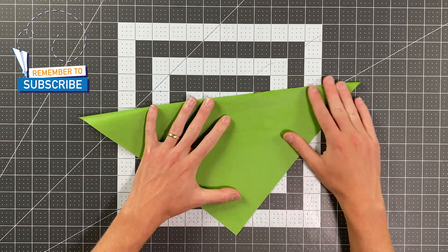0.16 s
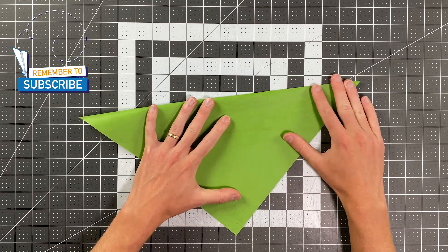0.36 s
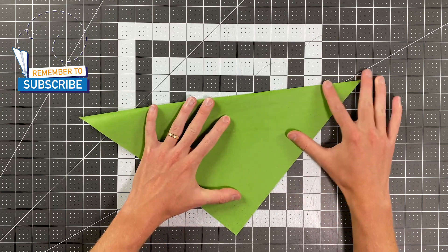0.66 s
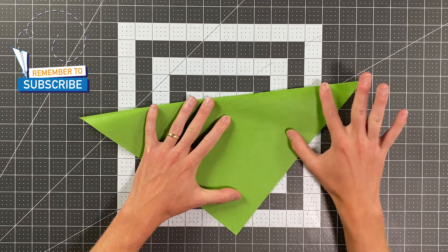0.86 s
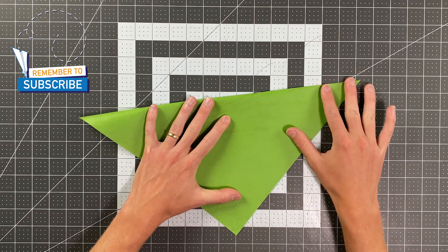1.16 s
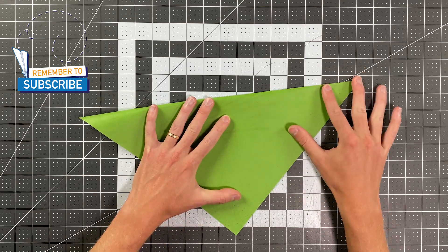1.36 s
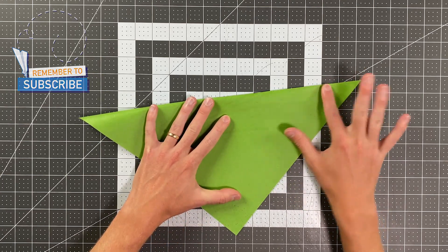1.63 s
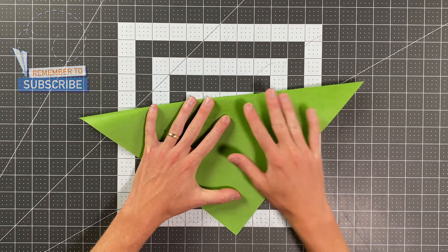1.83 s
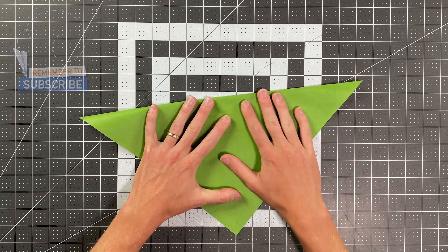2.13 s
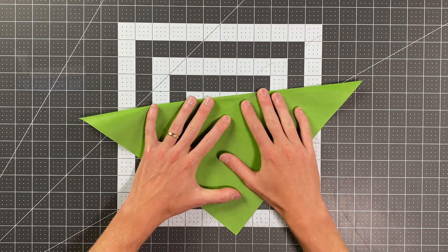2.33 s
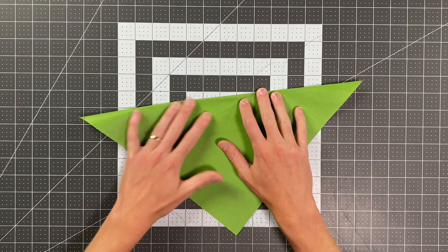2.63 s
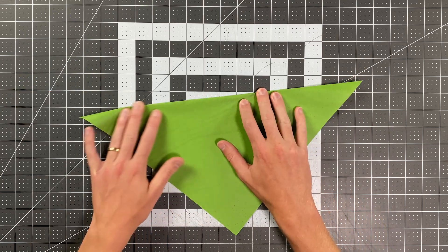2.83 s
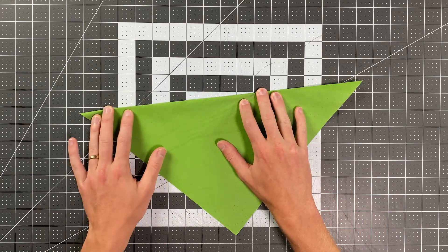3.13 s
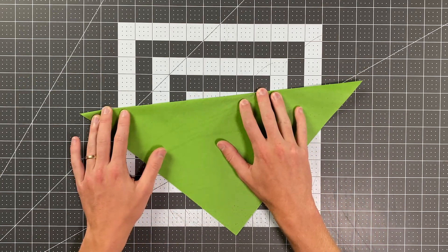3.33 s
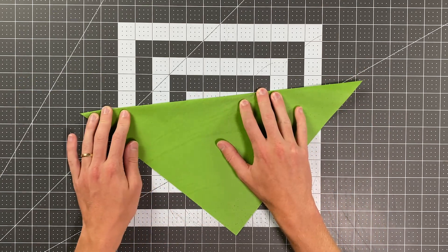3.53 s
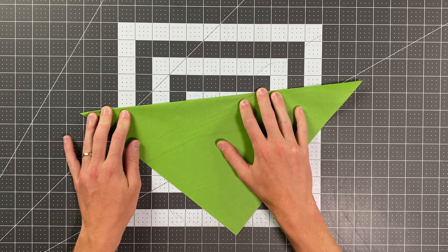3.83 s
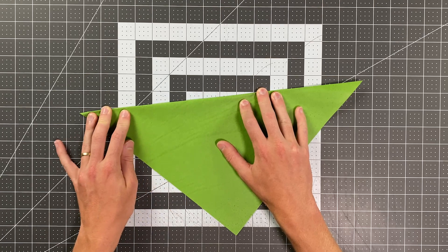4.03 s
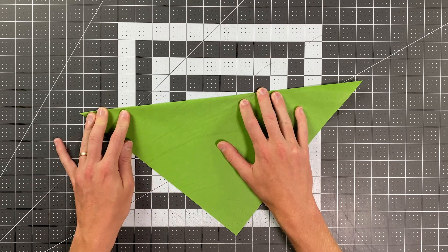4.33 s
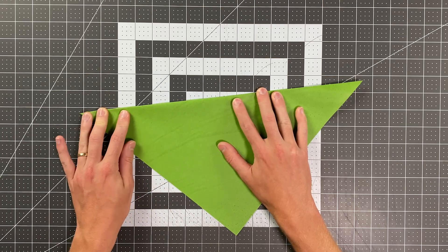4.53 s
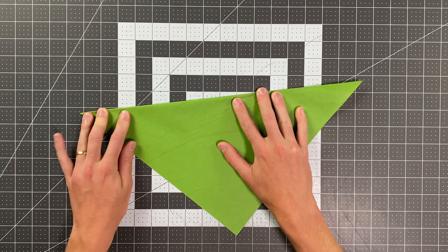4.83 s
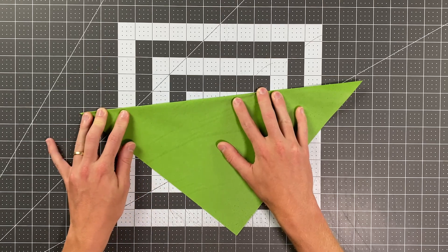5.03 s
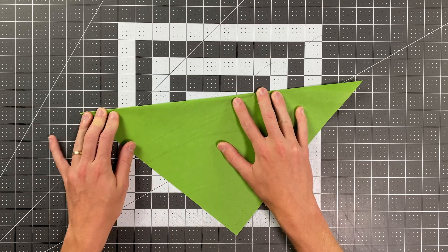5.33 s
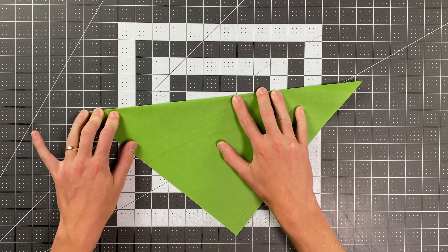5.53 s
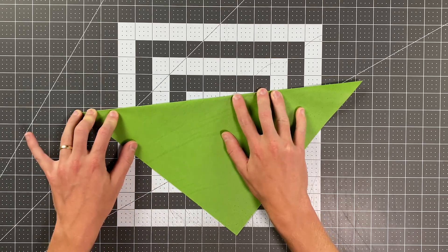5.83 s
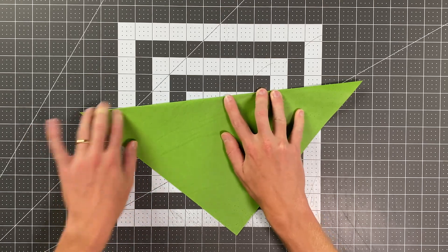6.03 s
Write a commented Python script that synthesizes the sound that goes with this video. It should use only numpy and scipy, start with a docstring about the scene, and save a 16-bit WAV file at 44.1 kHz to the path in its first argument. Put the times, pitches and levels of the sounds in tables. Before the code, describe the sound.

A close, dry sound of hands folding a big thin paper sheet on a table in a small room, with faint low hum and hiss. At 0 s a sharp crinkle opens a bright, hissing hand slide whose papery ring rises, fading by 0.3 s. A short finger swish comes at 0.6 s, then a cluster of thin crackles from 0.8 to 1.03 s. Light pats and scuffs follow at 1.25 and 1.4 s. Around 1.65-1.75 s the sheet crackles and rustles loose; a crisp snap comes at 1.94 s. A muffled double pat thumps the table at 2.34 s. At 2.66 s a loud, sharp snap cuts into a second, softer swish, ending near 3.07 s. Then mostly quiet: little rubs around 3.2 and 3.5 s, a tick and scuff at 4.1 s, stuttering fingertip ticks at 4.3 and faintly 4.9 s, brief scuffs from 5.1 to 5.5 s, ticks with a soft pat at 5.76 s, and a final quick swish near 6.1 s.

```python
"""Folding a paper sheet

Two hands press a fold into a large sheet of thin paper on a cutting mat, close to a microphone in a small room.
Fingers swish along the crease: shaped noise for friction, with a tuned band of noise for the ringing sheet.
The buckling sheet snaps as dispersive bending waves; stick-slip fingertips stutter; pats excite table modes.
The freed sheet rustles as it lifts and sinks. Mains hum and a faint hiss lie underneath."""
import sys
import numpy as np
from scipy import signal
from scipy.fft import rfft, irfft, next_fast_len
from scipy.io import wavfile
from scipy.ndimage import uniform_filter1d, map_coordinates

SR = 44100
rng = np.random.default_rng(int(sys.argv[2]) if len(sys.argv) > 2 else 0)


def transcribe(signal):
    """Save signal, clipped to [-1, 1], as a 16-bit WAV file at the path in sys.argv[1]."""
    frames = np.atleast_2d(signal).T
    limited = np.clip(frames, -1, 1)
    pcm = np.round(limited * 32767).astype(np.int16)
    wavfile.write(sys.argv[1], SR, pcm)


N = 272538


def amp(db):
    """Logarithmic level: decibels become a linear gain."""
    return 10 ** (np.asarray(db) / 20)


def unit(x):
    """Normalisation: scale to rms 1."""
    return x / np.sqrt(np.mean(x ** 2) + 1e-20)


def along(points, hz):
    """Interpolation on a logarithmic frequency axis through (frequency [Hz], value) points."""
    f, v = np.transpose(points)
    return np.interp(np.log(hz + 1), np.log(f + 1), v)


def filtered(x, response):
    """Linear filtering: the spectrum of x is multiplied by a response of frequency."""
    n = x.shape[-1]
    padded = next_fast_len(n + SR // 10)
    hz = np.fft.rfftfreq(padded, 1 / SR)
    return irfft(rfft(x, padded) * response(hz), padded)[..., :n]


def coloured(x, spectrum):
    """Spectral shaping: x takes on a relative spectrum, at rms 1."""
    return unit(filtered(x, lambda hz: amp(along(spectrum, hz))))


def wobble(rate):
    """Slow random modulation: a smooth curve through `rate` random knots a second."""
    knots = rng.standard_normal(int(N * rate / SR) + 4)
    return map_coordinates(knots, [np.arange(N) * rate / SR])


def add(track, s, sound):
    """Superposition: mix a sound into the track at s seconds."""
    part = track[max(0, round(s * SR)):][:len(sound)]
    part += sound[:len(part)]


def ring(modes, attack):
    """Modal decay, peak 1: damped sines whose strengths and phases differ with the spot that is struck."""
    t = np.arange(SR // 6) / SR
    hz, db, t60 = np.transpose(modes)[:, :, None]
    strength_db, phase = rng.standard_normal((2, len(modes), 1))
    decay = amp(db + strength_db - 60 * t / t60)
    x = np.sum(decay * np.sin(2 * np.pi * (hz * t + phase)), axis=0)
    x = x * (1 - np.exp(-t / attack))
    return x / np.abs(x).max()


def burst(spectrum, t60):
    """Exponential decay of diffuse energy: a puff of shaped noise, peak 1."""
    t = np.arange(SR // 6) / SR
    x = coloured(rng.standard_normal(len(t)), spectrum) * amp(-60 * t / t60)
    return x / np.abs(x).max()


def patchy(x, depth_db):
    """Moving contact: the colour of a rub drifts as it passes over the sheet."""
    z = signal.stft(x, nperseg=512)[2]
    over_frequency = uniform_filter1d(rng.standard_normal(z.shape), size=9, axis=0)
    field = uniform_filter1d(over_frequency, size=14, axis=1)  # smoothed in time as well
    return signal.istft(z * amp(depth_db * unit(field)), nperseg=512)[1][:N]


def rub(spectrum, grains, grain_share, flutter_db):
    """Granular friction: fibres catch (`grains` a second) over a dense hiss, under wavering pressure."""
    catches = unit((rng.random(N) < grains / SR) * rng.standard_normal(N))
    dense = rng.standard_normal(N)
    drive = np.sqrt(grain_share) * catches + np.sqrt(1 - grain_share) * dense
    pressure = amp(flutter_db * wobble(130))
    return unit(patchy(coloured(drive, spectrum), depth_db=1.5) * pressure)


# the electric hum, mains frequency and harmonics: (frequency [Hz], rms level [dB])
HUM_LINES = [(60, -55), (120, -75.5), (180, -66.5), (300, -78), (420, -85), (540, -83)]
# microphone hiss spectrum: (frequency [Hz], relative density [dB])
HISS_SPECTRUM = [(200, 3), (450, 4.5), (1000, 4.5), (2000, 1.5), (5000, -0.5), (15000, -1)]
# low room noise spectrum: (frequency [Hz], relative density [dB])
RUMBLE_SPECTRUM = [(20, -46), (42, -2.5), (90, 0.5), (200, -1.5), (400, -11.5), (900, -33.5)]


def background():
    """Steady sources: harmonic mains hum, low room noise and partly correlated microphone hiss."""
    t = np.arange(N) / SR
    hum = sum(np.sqrt(2) * amp(db) * np.sin(2 * np.pi * (hz * t + rng.random())) for hz, db in HUM_LINES)
    shared = rng.standard_normal(N)
    separate = amp(2.5) * rng.standard_normal((2, N))  # one per channel
    hiss = coloured(shared + separate, HISS_SPECTRUM)
    rumble = coloured(rng.standard_normal(N), RUMBLE_SPECTRUM)
    return hum + amp(-69.5) * hiss + amp(-72.0) * rumble


# the right hand works first, then the left one
HAND_CHANGE_S, HAND_CHANGE_LENGTH_S = 2.7, 0.57  # middle and length of the change


def left_hand():
    """Linear crossfade: share of the work done by the left hand, 0 to 1."""
    return np.clip((np.arange(N) / SR - HAND_CHANGE_S) / HAND_CHANGE_LENGTH_S + .5, 0, 1)


# skin on paper: (frequency [Hz], relative density [dB])
FRICTION_SPECTRUM = [(150, -11), (600, -12), (1600, -14), (3000, -12.5), (5500, -3.5), (8300, 0.5),
                     (10000, -1), (12000, -2), (14500, -7), (16000, -10.5)]
RIGHT_FIZZ_DB, LEFT_FIZZ_DB = 0, -3.5  # gain of the friction above 10 kHz


def skin_friction():
    """Broadband friction noise of skin on paper, its top end set by the hand that rubs."""
    hiss = rub(FRICTION_SPECTRUM, grains=5000, grain_share=0.5, flutter_db=1.2547)
    top = filtered(hiss, lambda hz: hz ** 12 / (hz ** 12 + 10000. ** 12))
    fizz_db = RIGHT_FIZZ_DB + (LEFT_FIZZ_DB - RIGHT_FIZZ_DB) * left_hand()
    return hiss - top + top * amp(fizz_db)


# the sheet's ring under a sliding hand or finger: (frequency [Hz], relative density [dB])
RING_SPECTRUM = [(500, -34), (1200, -21), (2050, -10.5), (2700, -2.5), (3300, 3.5), (3800, -1), (4500, -4),
                 (6500, -12.5), (12000, -42.5)]


def tuned(sheet, ring_hz):
    """Resampling at a varying pace: the sheet's strongest ring moves to a pitch that changes with time."""
    strongest_hz = max(RING_SPECTRUM, key=lambda point: point[1])[0]
    pace = ring_hz / strongest_hz
    return map_coordinates(sheet, [np.cumsum(pace) % (N - 1)], mode="wrap")


# a whole hand slides out along the fold: (start [s], end [s], hold [s], friction level [dB],
# fade after the hold [dB/s], initial sheet ring above the friction [dB], first ring pitch [Hz])
HAND_SLIDES = [(-.03, 0.301, .03, -36, 123, -2, 3102), (2.511, 3.074, 0.23, -41, 49, -1.5, 2602)]
SLIDE_ATTACK_S, SLIDE_RELEASE_S = 0.02265, 0.0096  # time constants: the hand gets going; it lifts off
RING_CLIMB_HZ, RING_CLIMB_S = 1148, .3  # the ring rises as the hand stretches the sheet, then settles
RING_FADE_DB_PER_S = 13.5  # the ring dies faster than the friction once the hand slows


def slides():
    """Sliding friction with a tension-raised ring: a hand gets going, holds its speed, slows and lifts."""
    t = np.arange(N) / SR
    friction = skin_friction()
    sheet = rub(RING_SPECTRUM, grains=1400, grain_share=.25, flutter_db=0.4)
    out = np.zeros(N)
    for start, end, hold, db, fade, ring_db, first_hz in HAND_SLIDES:
        age = np.clip(t - start, 0, end - start)
        lift_off = np.exp(-np.maximum(t - end, 0) / SLIDE_RELEASE_S)
        contact = (1 - np.exp(-age / SLIDE_ATTACK_S)) * lift_off
        slowing = np.maximum(age - hold, 0)
        speed = contact * amp(db - fade * slowing)
        ring_hz = first_hz + RING_CLIMB_HZ * (1 - np.exp(-age / RING_CLIMB_S))
        ringing = amp(ring_db - RING_FADE_DB_PER_S * slowing) * tuned(sheet, ring_hz)
        out += speed * (friction + ringing)
    return out


# a snap's main note: (multiple of its pitch [1], relative level [dB])
SHEET_NOTE = [(.3, -38), (.5, -15), (.65, -11.5), (.85, -7), (1, 4.5), (1.15, -6), (1.33, -9), (1.55, -21),
              (2.4, -38.5), (4, -55)]
# the lower flap of a snap's slack side: (frequency [Hz], relative density [dB])
FLAP_SPECTRUM = [(200, -38.5), (700, -14), (930, -9), (1080, -3), (1350, -6.5), (2100, -9), (3200, -22.5),
                 (8000, -49)]
# the bright crack of the fibres: (frequency [Hz], relative density [dB])
CRACK_SPECTRUM = [(2500, -30), (5000, -2), (7500, 4.5), (10500, -5.5), (15000, -20)]


def bending_wave(pitch_hz, flap_db, crack_db, travel, echo):
    """Dispersion of one buckle, peak 1: treble outruns bass through the sheet, and the edges send it back."""
    size = SR // 6
    hz = np.fft.rfftfreq(size, 1 / SR)
    note = amp(along(SHEET_NOTE, hz / pitch_hz))
    flap = amp(flap_db + along(FLAP_SPECTRUM, hz))
    crack = amp(crack_db + along(CRACK_SPECTRUM, hz))
    paths = travel * np.cumsum(rng.uniform(.7, 1.3, 4))  # travel times at the pitch [s]
    strengths = echo ** np.arange(4) * np.exp(2j * np.pi * rng.random(4))
    # delay falls with the square root of frequency
    arrivals = strengths @ np.exp(-4j * np.pi * paths[:, None] * np.sqrt(hz * pitch_hz))
    x = irfft((note + flap + crack) * arrivals, size)
    x = x * np.minimum(np.linspace(2, 0, size), 1) ** 2  # fade the second half
    return x / np.abs(x).max()


# the sheet buckles: (time [s], relative level [dB], pitch [Hz], tautness [dB])
BUCKLES = [(0.0099, -6.5, 3050, 8), (0.087, -27.5, 3300, 8), (.475, -46.5, 3510, 11.5),
           (0.792, -30.5, 3470, -11), (0.797, -28.5, 3440, -11), (0.809, -31, 3580, -20),
           (.821, -34.5, 2780, -22), (.8435, -32.5, 3404, -8), (.883, -33, 3178, -14),
           (.975, -33.5, 2940, -12), (0.9823, -30, 3000, -11), (1.028, -29.5, 3045, 14.5),
           (1.6535, -30, 3960, 13.5), (1.666, -36, 3000, -3.5), (1.697, -41, 2270, -16.5),
           (1.7289, -26.5, 2800, -7), (1.7318, -28.5, 2880, -10), (1.898, -35.5, 2560, 3),
           (1.942, -13.5, 3360, 6.5), (1.9464, -18.5, 3090, 8.5), (2.515, -38, 2690, 7.5),
           (2.656, -8, 3435, 12.5), (2.656, -12.5, 3000, -15.5)]
# the shiver of a snap's taut side, also used for a dragged fingertip: (frequency [Hz], relative density [dB])
SHIVER_SPECTRUM = [(500, -33), (1200, -20.5), (2000, -4.5), (3100, 2.5), (4200, -5.5), (5500, -11),
                   (12000, -36)]
FLAP_LOSS = 0.87  # a taut spot cracks more and flaps less: dB lost per dB of tautness


def snaps():
    """Snap-through buckling: a dent flips with a sharp click, then the taut and the slack side shiver."""
    out = np.zeros(N)
    for s, db, pitch_hz, taut_db in BUCKLES:
        loss_db = FLAP_LOSS * taut_db
        click = bending_wave(pitch_hz, -11.5 - loss_db, taut_db - 32, travel=.0007, echo=.7)
        taut_side = amp(-17.5) * burst(SHIVER_SPECTRUM, t60=0.058)
        slack_side = amp(-25.5 - loss_db) * burst(FLAP_SPECTRUM, t60=0.13)
        add(out, s, amp(db - 1.9) * (click + taut_side + slack_side))
    return out


STROKE_DROP_DB, STROKE_SHAPE = 11.5, 2.1  # drop one rise or fall length from the peak; roundness of the swell


def swell(peak_s, rise_s, fall_s, db):
    """Speed envelope: the rounded rise and fall of one finger movement, as gain."""
    t = np.arange(N) / SR - peak_s
    lengths = np.where(t < 0, rise_s, fall_s)
    return amp(db - STROKE_DROP_DB * np.abs(t / lengths) ** STROKE_SHAPE)


# a finger rubs the crease, swelling and fading evenly: (peak time [s], half length [s],
# friction level [dB], sheet ring above the friction [dB], ring pitch [Hz])
FINGER_STROKES = [(0.243, 0.066, -56.5, -15.5, 3214), (0.617, 0.046, -44.5, -14, 2890),
                  (0.768, 0.047, -52, -7, 3200), (0.936, 0.058, -72, 7.5, 3519),
                  (1.025, 0.019, -50.5, -6, 3206), (1.419, 0.025, -53.5, -9, 3096),
                  (1.742, .045, -77.5, 14, 2956), (1.925, 0.035, -59, 5.5, 3310),
                  (3.173, 0.022, -58, -9.5, 3401), (3.536, .016, -54, -10.5, 3503),
                  (3.582, 0.035, -60.5, -5, 3500), (4.438, 0.028, -51.5, -10, 3687),
                  (5.118, 0.019, -51.5, -12, 3992), (5.388, 0.0094, -49.5, -14.5, 3340),
                  (5.505, 0.038, -66.5, -0.5, 3795), (5.702, 0.029, -62, 2, 4094),
                  (5.758, 0.029, -53, -6, 4005), (5.984, 0.06, -54.5, -4.5, 3460),
                  (6.077, 0.02, -42.5, -7.5, 3400), (6.175, 0.023, -47.5, -0.5, 4100)]
# a fingertip lands and skids to a stop: (peak time [s], skid length [s], friction level [dB])
FINGER_SKIDS = [(.493, .002, -58.5), (.565, 0.01645, -51.5), (1.076, 0.0162, -54), (1.251, 0.025, -54.5),
                (1.43, .006, -50), (2.294, .003, -57.5), (3.197, 0.00932, -52), (4.086, 0.014, -43),
                (5.07, 0.022, -44.5), (5.439, 0.0085, -45), (5.629, 0.0095, -55), (6.02, 0.01, -54.5),
                (6.057, 0.0049, -49.5)]
SKID_ATTACK_S, SKID_RING_DB = .0035, -11.5  # rise length; sheet ring above the friction


def swishes():
    """Friction-excited resonance: short strokes and skids hiss on the paper and set the sheet ringing."""
    moves = [(swell(s, half, half, db), ring_db) for s, half, db, ring_db, _ in FINGER_STROKES]
    moves += [(swell(s, SKID_ATTACK_S, skid, db), SKID_RING_DB) for s, skid, db in FINGER_SKIDS]
    peaks_s, *_, rings_hz = np.transpose(FINGER_STROKES)
    ring_hz = np.interp(np.arange(N) / SR, peaks_s, rings_hz)  # glides from stroke to stroke
    friction = skin_friction()
    sheet = tuned(rub(RING_SPECTRUM, grains=1500, grain_share=0.46, flutter_db=1.6), ring_hz)
    return sum(speed * (friction + amp(ring_db) * sheet) for speed, ring_db in moves)


# a fingertip's dry tick in the crease: (frequency [Hz], relative density [dB])
CREASE_SPECTRUM = [(400, -18), (1100, -14.5), (1550, -11), (2100, -9.5), (3200, -9), (5000, -14),
                   (14000, -33)]
# the pressed crease rings briefly: (nominal frequency [Hz], relative level [dB], t60 [s])
CREASE_MODES = [(1532, -1, 0.022), (3257, -9.5, 0.021)]
CREASE_RING_DB, CREASE_SPREAD = -3.5, 0.067  # beside the dry tick; scatter of log pitch from tick to tick


def crease_tick():
    """Impulse excitation: a dry tick of the crease with a brief ring whose pitch depends on the spot."""
    stretch = np.exp(CREASE_SPREAD * rng.standard_normal())
    modes = [(hz * stretch, db, t60) for hz, db, t60 in CREASE_MODES]
    return burst(CREASE_SPECTRUM, t60=0.0157) + amp(CREASE_RING_DB) * ring(modes, attack=0.00019)


# fingertips stick and slip along the crease: (start [s], end [s], slip rate [1/s],
# mean tick level [dB], mean table level [dB], peak rub level [dB])
STICK_SLIPS = [(0.564, 0.643, 60, -66.5, -55.5, -75), (4.261, 4.376, 63.5, -50.5, -49, -73),
               (4.828, 4.936, 68, -61, -55, -66.5), (5.132, 5.175, 60, -60, -54, -76),
               (5.373, 5.42, 85, -49.5, -57.5, -66)]
# single ticks of the crease under a pressing finger: (time [s], dry tick peak [dB])
SINGLE_TICKS = [(2.295, -45), (3.938, -50.5), (4.029, -52.5), (4.11, -50), (4.638, -48.5), (4.832, -54),
                (5.466, -49.5), (5.759, -42), (5.771, -44)]
# a dragged fingertip's nudge through the mat: (frequency [Hz], relative density [dB])
NUDGE_SPECTRUM = [(70, -12), (130, 2.5), (270, 9.5), (380, -14), (550, -42), (2000, -46)]
SLIP_JITTER = .09  # random lateness, as a share of the time between slips


def stutters():
    """Stick-slip: a dragged fingertip rubs, and each slip ticks and nudges the table; a pressing one ticks once."""
    out = np.zeros(N)
    drag = rub(SHIVER_SPECTRUM, grains=900, grain_share=0.38, flutter_db=3.5)
    for start, end, rate, tick_db, table_db, rub_db in STICK_SLIPS:
        half = (end - start) / 2
        out += swell(start + half, half, half, rub_db) * drag
        for k, (late, size) in enumerate(rng.standard_normal((12, 2))):
            s = start + (k + SLIP_JITTER * late) / rate
            slip = amp(tick_db) * crease_tick() + amp(table_db) * burst(NUDGE_SPECTRUM, t60=0.113)
            add(out, s, (s < end) * amp(2.39 * size) * slip)  # silent after the end
    for s, db in SINGLE_TICKS:
        add(out, s, amp(db) * crease_tick())
    return out


# hands land on the table: (time [s], relative level [dB], relative skin slap [dB])
HAND_PATS = [(1.245, -40, -11.5), (1.396, -37, -4.5), (1.666, -43, 2.5), (1.695, -37.5, -3),
             (1.969, -36.5, -32), (2.338, -29.5, -11.5), (2.341, -20, -15), (2.358, -26, -12.5),
             (2.375, -28, -18), (2.448, -46, -14.5), (4.099, -40, -12), (4.339, -36.5, -34),
             (4.358, -37.5, -36), (5.381, -39, -3.5), (5.626, -40, -6), (5.755, -32.5, -8.5),
             (6.167, -41, -6)]
# modes of the table top: (frequency [Hz], mean relative level [dB], t60 [s])
TABLE_MODES = [(129.9, -6, 0.096), (200.5, -0.5, 0.2), (254.2, 1.5, 0.091), (403.7, -7, 0.14),
               (524, -13, 0.11), (625.3, -14, 0.097), (964.2, -17.5, 0.12), (1227, -17, 0.064)]
# soft skin slapping the sheet: (frequency [Hz], relative density [dB])
SLAP_SPECTRUM = [(100, -10), (250, -8.5), (480, 1), (750, 2.5), (1350, -1), (1900, -7.5), (3000, -13),
                 (8000, -28.5)]


def pats():
    """Modal excitation: soft blows ring the table top; the skin adds a dull slap."""
    out = np.zeros(N)
    for s, db, slap_db in HAND_PATS:
        table = ring(TABLE_MODES, attack=0.001)
        slap = amp(slap_db + 4.0) * burst(SLAP_SPECTRUM, t60=0.25)
        add(out, s, amp(db - 8.5) * (table + slap))
    return out


# the freed sheet springs up, then sinks back: (peak time [s], level [dB], rise [dB/s], fall [dB/s])
SHEET_LIFTS = [(1.736, -57.5, 199.5, 68), (1.959, -51.5, 275, 304)]
# rustle of the loose sheet: (frequency [Hz], relative density [dB])
LOOSE_SPECTRUM = [(150, -13), (500, 1.5), (1100, -1), (2000, -1), (3200, 0.5), (4400, -4.5), (5500, -10),
                  (15000, -20)]
SINK_DB, SINK_DB_PER_S, SINK_CORNER_HZ = -67, 11, 1007  # the dull rustle that lingers after the first lift


def settling():
    """Granular contact noise: the freed sheet rustles and crackles on the mat; a low-passed rustle lingers."""
    t = np.arange(N) / SR
    motion = sum(amp(db - np.maximum(rise * (s - t), fall * (t - s))) for s, db, rise, fall in SHEET_LIFTS)
    s, _, rise, _ = SHEET_LIFTS[0]
    sinking = amp(SINK_DB - np.maximum(rise * (s - t), SINK_DB_PER_S * (t - s)))
    rustle = rub(LOOSE_SPECTRUM, grains=360, grain_share=0.45, flutter_db=1.5)
    dull = unit(filtered(rustle, lambda hz: 1 / (1 + (hz / SINK_CORNER_HZ) ** 2) ** 2))
    return motion * rustle + sinking * dull


# reverberation: (frequency [Hz], t60 [s])
ROOM_DECAY = [(200, 0.33), (1000, 0.17), (3500, 0.22), (8000, 0.14), (15000, 0.057)]


def room(x):
    """Reverberation: the walls answer after 7 ms with a diffuse tail of frequency-dependent decay."""
    hz, t, z = signal.stft(rng.standard_normal(SR // 2), SR, nperseg=256)
    decay = amp(-60 * t / along(ROOM_DECAY, hz)[:, None])
    tail = signal.istft(z * decay, SR, nperseg=256)[1]
    tail = np.pad(tail / np.linalg.norm(tail), (round(0.007 * SR), 0))
    return signal.fftconvolve(x, tail)[:N]


# stereo width of the room: (frequency [Hz], side level [dB])
SIDE_WIDTH = [(150, -34), (600, -28), (1200, -23.5), (2500, -30.5), (8000, -17.5), (15000, -10.5)]


def scene():
    """Mid-side stereo: the hands lie straight ahead; the room adds a little width, mostly in the treble."""
    hands = slides() + snaps() + swishes() + stutters() + pats() + settling()
    side = filtered(room(hands), lambda hz: amp(along(SIDE_WIDTH, hz)))
    return hands + amp(-10.5) * room(hands) + np.array([side, -side]) + background()


TOP_HZ = 15900  # band limit


def record(dry):
    """Band limitation: nothing is kept from the limit upwards."""
    return filtered(dry, lambda hz: hz < TOP_HZ)


dry = scene()
out = record(dry)
transcribe(out)
```